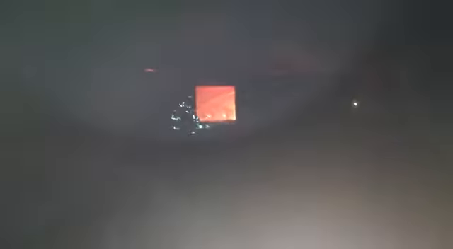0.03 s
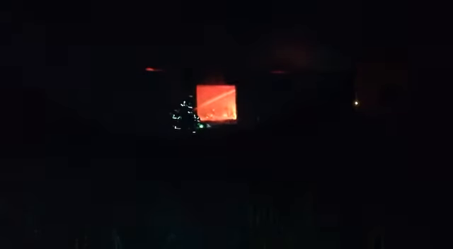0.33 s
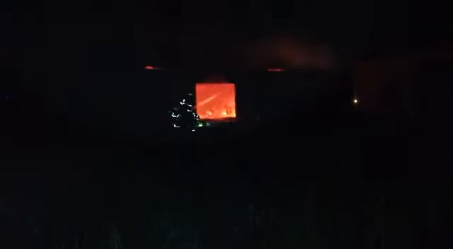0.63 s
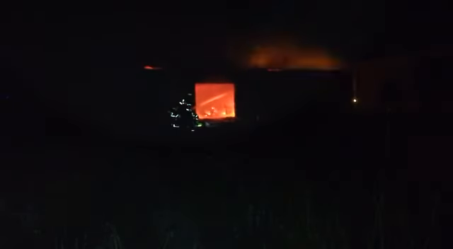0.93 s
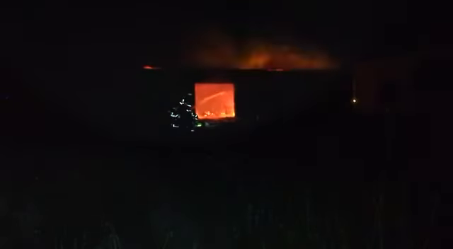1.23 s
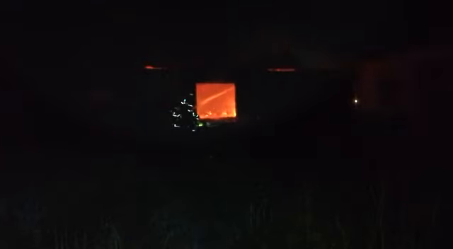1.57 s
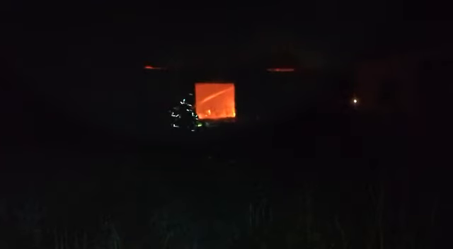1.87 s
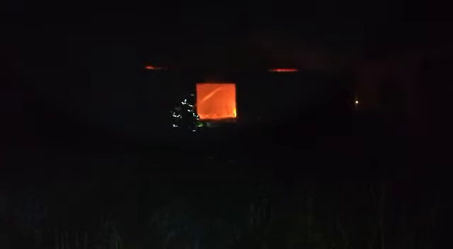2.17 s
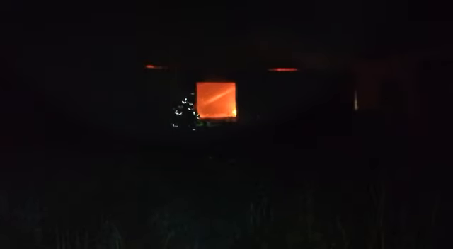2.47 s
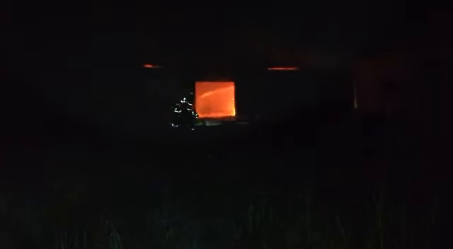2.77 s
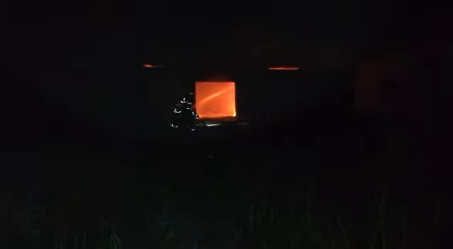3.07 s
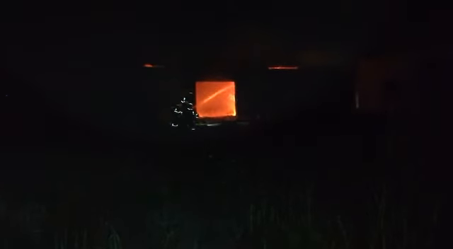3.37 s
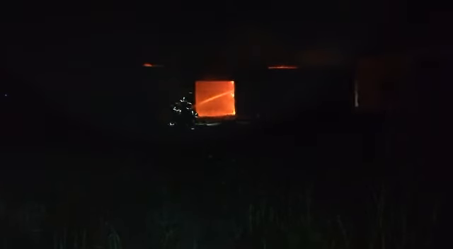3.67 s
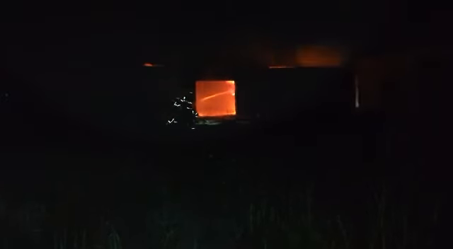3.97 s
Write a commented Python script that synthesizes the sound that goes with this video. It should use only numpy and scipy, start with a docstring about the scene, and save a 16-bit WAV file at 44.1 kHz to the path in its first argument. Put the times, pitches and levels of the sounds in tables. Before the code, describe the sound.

A hose jet splashes and hisses on a burning building over a low rumble.

```python
"""A surging rush of water, probably a hose jet, sweeps the walls of a burning building at night.
Heard from some distance outdoors, its countless drops splash, its fine spray hisses, and now
and then it drums in a hollow. The flames rumble and flare below it, and an engine, likely
the pump, hums steadily underneath."""
import sys
import numpy as np
from scipy import signal
from scipy.fft import rfft, irfft
from scipy.io import wavfile

SR = 44100
rng = np.random.default_rng(int(sys.argv[2]) if len(sys.argv) > 2 else 0)


def generate_wav(sig):
    """Save sig (samples, or channels by samples) to the path in sys.argv[1] as 16-bit PCM at SR."""
    pcm = np.round(np.clip(np.atleast_2d(sig).T, -1, 1) * 32767).astype(np.int16)
    wavfile.write(sys.argv[1], SR, pcm)


N = 176400
T = np.arange(N) / SR
HZ = np.fft.rfftfreq(N, 1 / SR)
BODY_BELOW_HZ, HISS_FROM_HZ, FIZZ_FROM_HZ = 713, 2515, 10500

# Surges of the splash as the jet moves: time_s, level_db
SPLASH_SURGES = [(0, -39.5), (.16, -38.5), (.28, -36), (.41, -41.5), (.5, -37), (.94, -39.8), (.98, -34.8),
                 (1.08, -43.5), (1.22, -37.8), (1.33, -39), (1.43, -33.8), (1.57, -34.5), (1.63, -38.3),
                 (1.9, -37.7), (1.99, -33), (2.07, -36), (2.15, -33), (2.24, -32.7), (2.3, -29),
                 (2.49, -32.5), (2.57, -38.3), (2.9, -38), (2.96, -34.3), (3.08, -35.5), (3.26, -39.7),
                 (3.38, -35.8), (3.53, -34.3), (3.65, -42), (4, -41.5)]
def splash(slap_share=0.29):
    """The jet breaks on the building in a fluttering midrange rush that thickens when it hits harder."""
    level_db = curve(SPLASH_SURGES) + 0.2 * wander(30)
    upper = above(BODY_BELOW_HZ)
    mids = water_tone(drops(slap_share), upper * (1 - above(HISS_FROM_HZ)))
    mids = turbulence(mids, depth_db=1.5, patch_s=0.089, patch_hz=616)
    body = water_tone(drops(slap_share), 1 - upper)
    body_db = -52.5 + 1.3 * (level_db - level_db.mean())
    return unit(mids) * amp(level_db) + body * amp(body_db)


# Surges of the spray's hiss: time_s, level_db
HISS_SURGES = [(0, -38.6), (.4, -38.5), (.79, -36.5), (1.05, -40), (1.32, -37.6), (1.42, -34.1),
               (1.56, -31.5), (1.63, -34.1), (1.98, -33), (2.08, -35), (2.29, -30.1), (2.62, -38.5),
               (2.82, -37), (2.96, -33.1), (3.07, -36.3), (3.25, -37.5), (3.33, -33.5), (3.52, -35.5),
               (3.61, -39), (3.8, -41), (4, -38)]
# Brief sizzles of the spray: peak_s, half_length_s, boost_db
SPRAY_SIZZLES = [(1.843, 0.0069, 4.5), (3.17, 0.013, 3.5), (3.515, 0.011, 4)]
def spray():
    """Fine spray hisses with the jet; its highest fizz follows the surges only a little."""
    top = above(FIZZ_FROM_HZ)
    level_db = curve(HISS_SURGES) + 0.37 * wander(25)
    level_db += sum(boost_db * swell(peak_s, half_s) for peak_s, half_s, boost_db in SPRAY_SIZZLES)
    hiss = water_tone(drops(slap_share=0.1), above(HISS_FROM_HZ) * (1 - top))
    hiss = turbulence(hiss, depth_db=0.98, patch_s=0.041, patch_hz=1480)
    fizz = water_tone(rng.standard_normal((2, N)), top)
    fizz_db = -47.5 + 0.23 * (level_db - level_db.mean()) + wander(12)
    return unit(hiss) * amp(level_db) + fizz * amp(fizz_db)


def drops(slap_share, slaps_per_s=900, spread_db=2):
    """Slaps of uneven size within a wash of countless small drops."""
    sizes = amp(spread_db * np.minimum(rng.exponential(1, N), 5))
    hits = rng.random(N) < slaps_per_s / SR
    slaps = unit(sizes * hits * rng.choice([-1., 1.], (2, N)))
    wash = rng.standard_normal((2, N))
    return np.sqrt(slap_share) * slaps + np.sqrt(1 - slap_share) * wash


# EQ and stereo image of the water: freq_hz, left_db, right_db, likeness (0-1), left_lead_rad
WATER_EQ = [(450, -18.0, -20.0, 0.56, 0.9), (600, -12.0, -15.5, 0.55, 0.4), (800, -10.5, -11.0, 0.68, 0.0),
            (980, -7.0, -8.0, 0.82, 0.1), (1300, -5.0, -5.5, 0.93, -0.0), (1650, -3.5, -6.5, 0.86, 0.2),
            (2020, -2.0, -7.0, 0.74, 0.4), (2230, -0.5, -14.0, 0.29, 1.2), (2450, -9.5, -15.0, 0.15, -2.0),
            (2850, -13.0, -11.5, 0.54, -0.6), (3200, -9.0, -9.0, 0.72, -0.5),
            (3900, -8.0, -10.5, 0.56, -0.5), (4250, -10.0, -9.5, 0.49, -1.3),
            (4650, -12.0, -9.0, 0.54, 0.3), (5200, -12.5, -11.0, 0.39, -0.5),
            (5950, -12.0, -5.5, 0.58, -1.1), (7000, -19.5, -9.0, 0.34, -0.7),
            (8300, -22.0, -14.5, 0.15, -1.4), (9200, -23.0, -14.0, 0.41, -0.3),
            (10400, -23.0, -19.0, 0.1, 0.3), (11600, -24.0, -23.0, 0.18, -1.3),
            (12800, -29.0, -24.5, 0.11, -2.5), (14200, -32.5, -22.0, 0.21, -3.1),
            (15600, -41.5, -24.5, 0.03, -1.3)]
def water_tone(noises, passband):
    """Shapes two unrelated noises into one stereo band of the rush, at rms 1."""
    left_db, right_db, likeness, lead_rad = spectrum(WATER_EQ)
    left, other = rfft(noises)
    right = blend(left, other, likeness) * np.exp(-1j * lead_rad)
    stereo = np.array([left * amp(left_db), right * amp(right_db)])
    return unit(irfft(stereo * np.sqrt(passband), N))


def turbulence(x, depth_db, patch_s, patch_hz, size=512):
    """Random patches of time and frequency grow louder or softer."""
    framing = dict(nperseg=size, noverlap=size * 3 // 4)
    spectra = signal.stft(x, **framing)[2]
    bins, frames = spectra.shape[1:]
    across = np.fft.fftfreq(bins, SR / size)[:, None]
    along = np.fft.fftfreq(frames, N / SR / frames)
    smooth = np.exp(-(across * patch_hz) ** 2 - (along * patch_s) ** 2)
    patches = unit(np.fft.ifft2(np.fft.fft2(rng.standard_normal((bins, frames))) * smooth).real)
    return signal.istft(spectra * amp(depth_db * patches), **framing)[1][:, :N]


# Hollows that the jet strikes: peak_s, half_length_s, pitch_hz, width_hz, level_db
HOLLOW_HITS = [(.238, 0.0034, 1570, 300, -33.5), (.268, 0.043, 1660, 140, -36.5),
               (3.405, .009, 1230, 260, -33), (3.462, 0.019, 1190, 250, -34),
               (3.515, 0.016, 1280, 260, -36)]
def hollows():
    """The jet drums in a hollow, which rings briefly."""
    return bursts(HOLLOW_HITS)


# Swells of the flames' roar: time_s, level_db
FLAME_SWELLS = [(0, -45.5), (.35, -49.5), (.55, -46.5), (1.08, -49.5), (1.27, -41.5), (1.58, -44.5),
                (2.03, -47), (2.28, -40), (2.7, -50), (2.98, -44), (3.2, -47), (4, -48)]
# Flames bursting through the roof: peak_s, half_length_s, pitch_hz, width_hz, level_db
ROOF_FLARES = [(1.1, .04, 28, 18, -47), (1.28, 0.077, 266, 22, -44.5), (1.38, 0.074, 35, 20, -39.5)]
def fire():
    """The roar of the flames swells and flares over a steady deep rumble."""
    upper = above(edge_hz=110)
    roar = rumble(upper, likeness=0.97) * amp(curve(FLAME_SWELLS))
    deep = rumble(1 - upper, likeness=1) * amp(-48.5)
    return roar + deep + bursts(ROOF_FLARES)


# EQ of the fire's rumble: freq_hz, gain_db
RUMBLE_EQ = [(8, -16), (22, -5), (45, 3.5), (100, 1), (170, 1), (255, -0.5), (320, -7), (400, -21.5),
             (520, -37.5), (1000, -48)]
def rumble(passband, likeness):
    """One band of the flames' low noise, centred in the stereo image, at rms 1."""
    gain = amp(spectrum(RUMBLE_EQ)[0]) * np.sqrt(passband)
    left, other = irfft(rfft(rng.standard_normal((2, N))) * gain, N)
    return unit(np.array([left, blend(left, other, likeness)]))


# Partials of the engine's hum: shaft_multiple, level_db
ENGINE_PARTIALS = [(1, -59), (2, -66), (3, -38.5), (6, -54), (18, -68.5), (21, -73.5)]
def engine(shaft_hz=19.93, waver_db=1.25, rise_db_per_s=0.3):
    """Three firings a turn make a steady deep hum; a narrow drone wavers above it."""
    turns = np.cumsum(shaft_hz * (1 + 0.0016 * wander(3.2))) / SR
    hum = np.zeros(N)
    for multiple, level_db in ENGINE_PARTIALS:
        gain = np.sqrt(2) * amp(level_db + waver_db * wander(1.4))
        hum += gain * np.sin(2 * np.pi * (multiple * turns + rng.random()))
    drone = amp(-53) * resonance(pitch_hz=160.8, width_hz=3.1)
    return hum * amp(rise_db_per_s * (T - T.mean())) + drone


def bursts(rows):
    """Short swells of resonant noise."""
    return sum(resonance(pitch_hz, width_hz) * amp(level_db) * swell(peak_s, half_s)
               for peak_s, half_s, pitch_hz, width_hz, level_db in rows)


def resonance(pitch_hz, width_hz):
    """Noise ringing in one steep-sided band."""
    return unit(irfft(rfft(rng.standard_normal(N)) / (1 + ((HZ - pitch_hz) / width_hz) ** 2) ** 2, N))


def swell(peak_s, half_s):
    """A bell-shaped fade in and out."""
    return np.exp(-.5 * ((T - peak_s) / half_s) ** 2)


def wander(rate_hz):
    """Random drift of rms 1, up to about the given rate."""
    return unit(irfft(rfft(rng.standard_normal(N)) * np.exp(-(HZ / rate_hz) ** 2) * (HZ > 0), N))


def blend(left, other, likeness):
    """A right channel that resembles the left: 0 is wide, 1 is mono."""
    return likeness * left + np.sqrt(1 - likeness ** 2) * other


def above(edge_hz):
    """Share of the power on the high side of a crossover."""
    return 1 / (1 + (edge_hz / (HZ + 1)) ** 10)


def spectrum(points):
    """Each column of an EQ table at every frequency."""
    freq_hz, *columns = np.transpose(points)
    return [np.interp(np.log(HZ + 1), np.log(freq_hz + 1), column) for column in columns]


def curve(points):
    """A fader curve at every sample."""
    return np.interp(T, *np.transpose(points))


def amp(db):
    """Decibels to gain."""
    return 10 ** (np.asarray(db) / 20)


def unit(x):
    """Scales to rms 1."""
    return x / np.sqrt(np.mean(x ** 2) + 1e-20)


def scene():
    """Water in front, fire and engine underneath."""
    return splash() + spray() + hollows() + fire() + engine()


def record(dry, cutoff_hz=15800):
    """A steep low-pass trims the highest treble."""
    lowpass = signal.firwin(1023, cutoff_hz, window=("kaiser", 9), fs=SR)
    return signal.oaconvolve(dry, lowpass[None], "same")


dry = scene()
out = record(dry)
generate_wav(out)
```